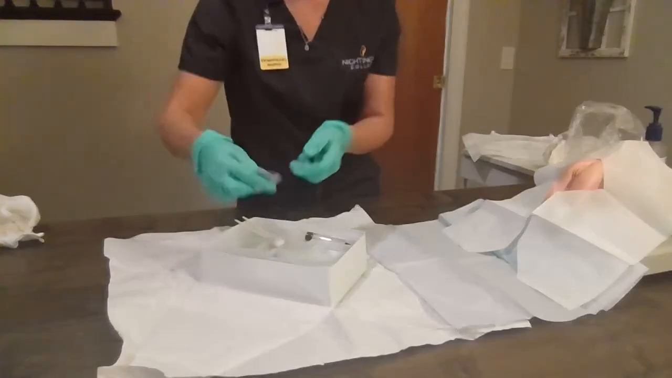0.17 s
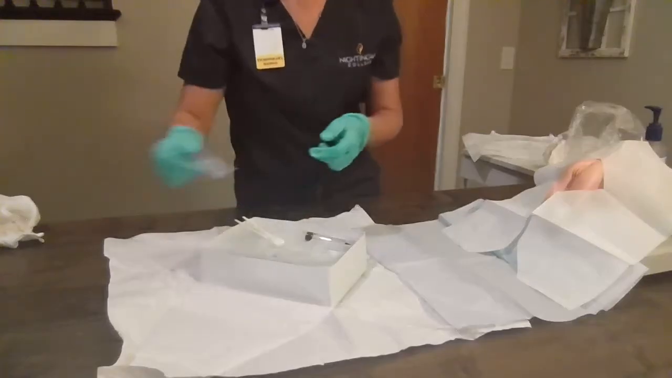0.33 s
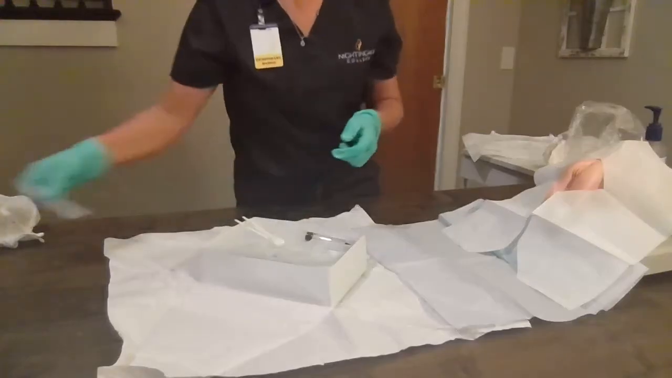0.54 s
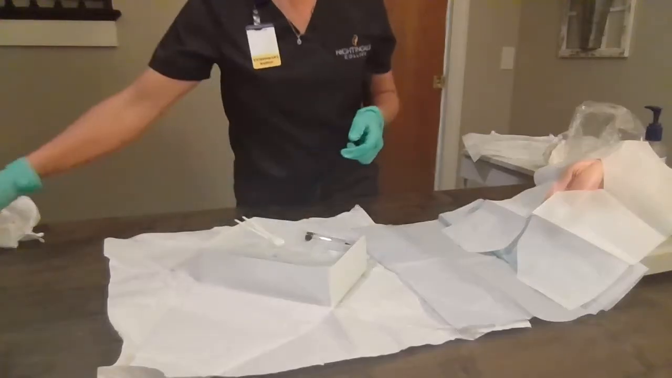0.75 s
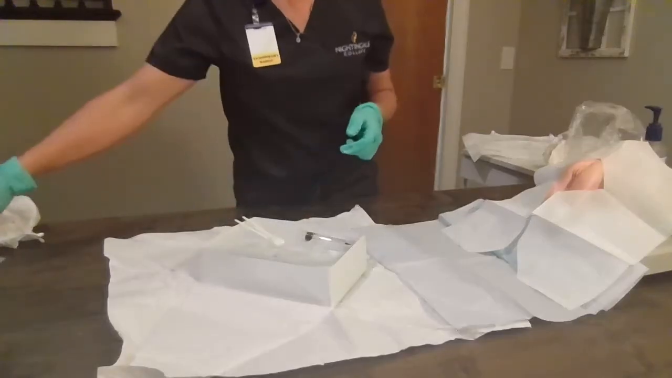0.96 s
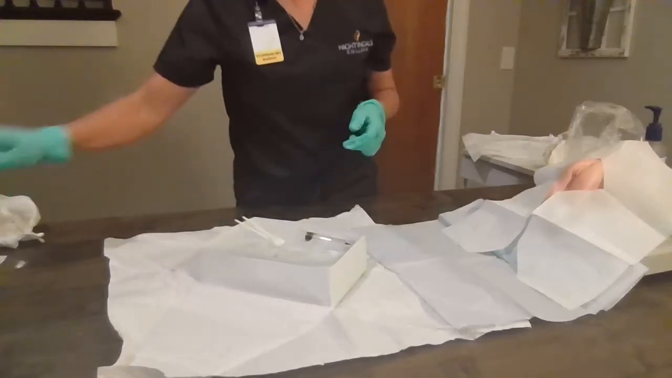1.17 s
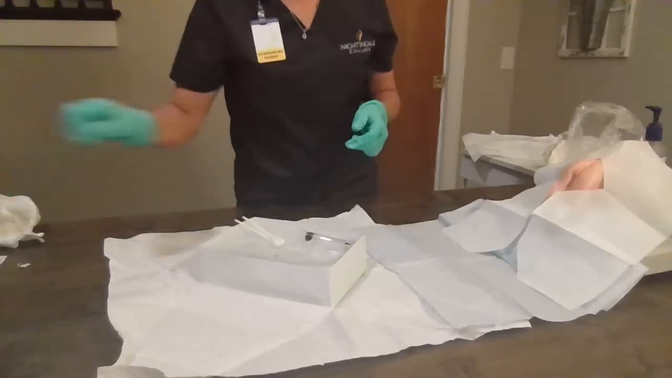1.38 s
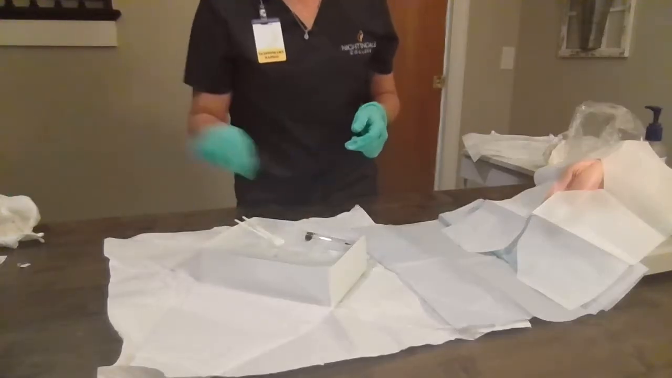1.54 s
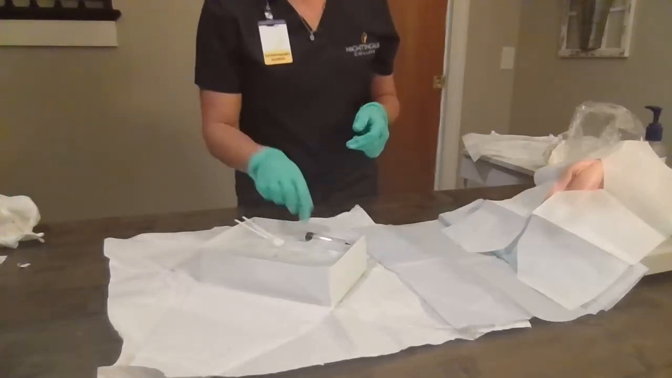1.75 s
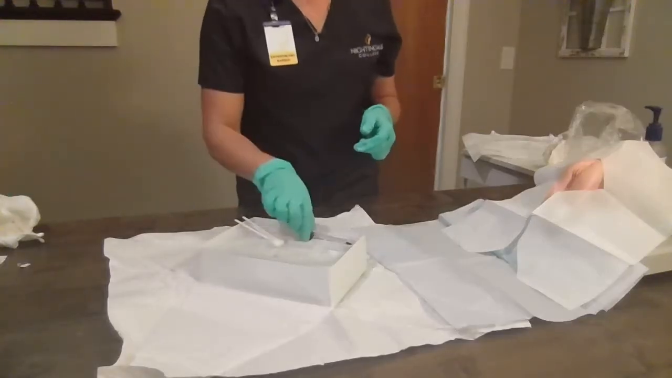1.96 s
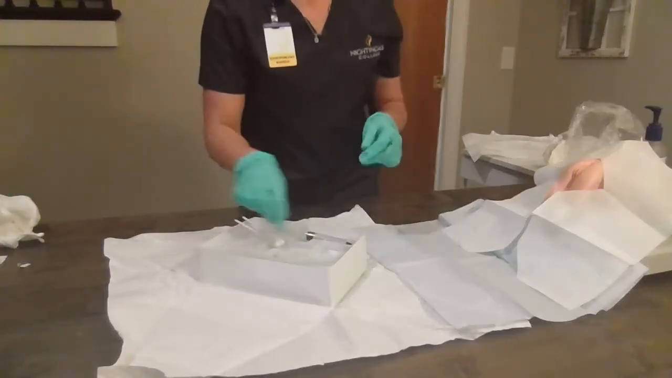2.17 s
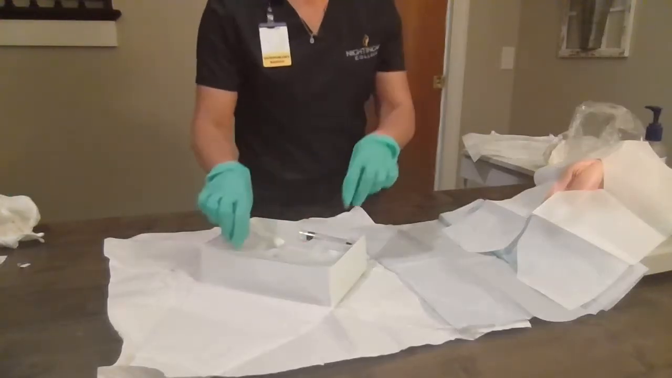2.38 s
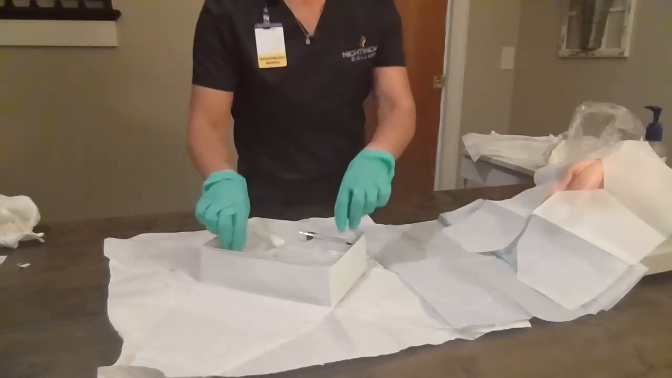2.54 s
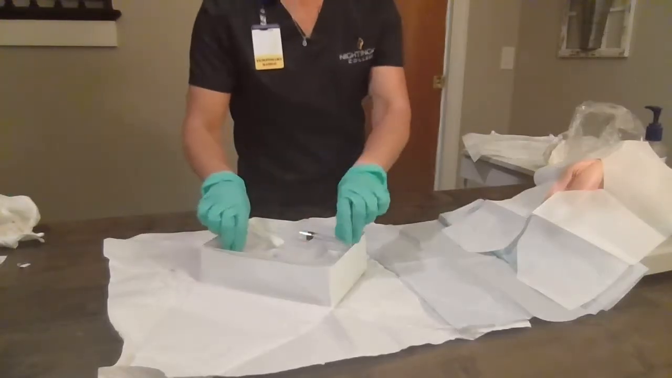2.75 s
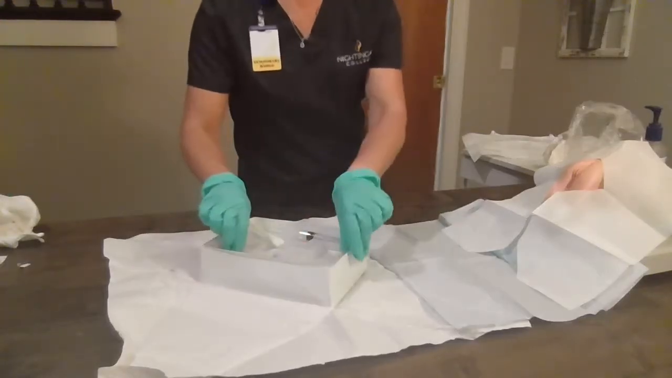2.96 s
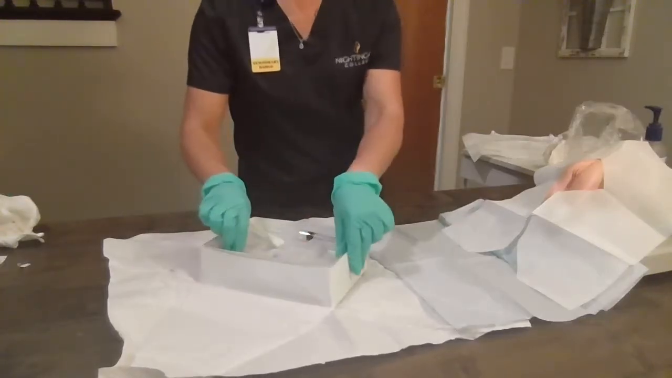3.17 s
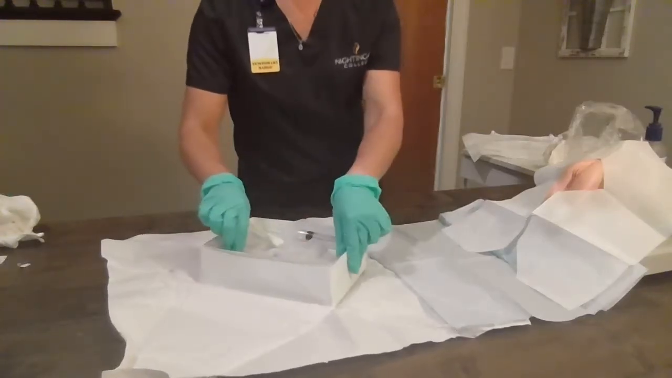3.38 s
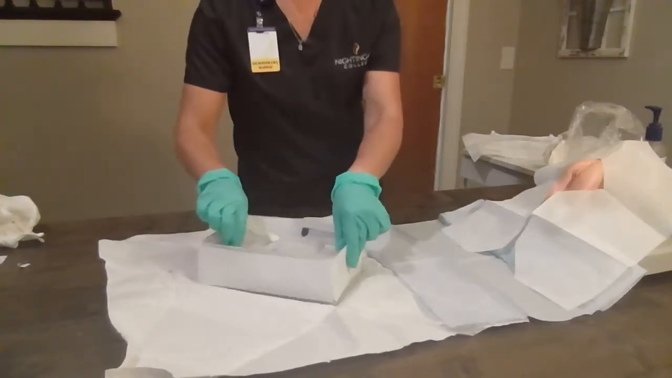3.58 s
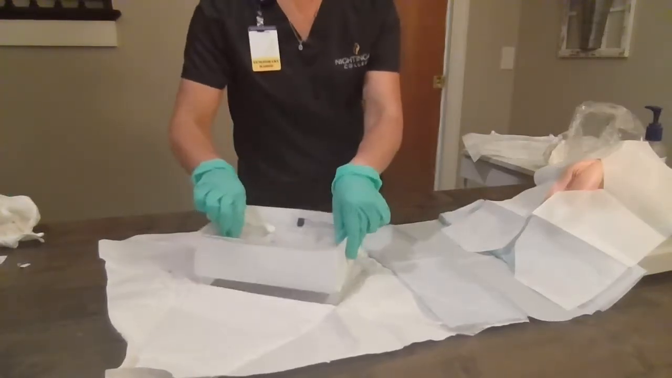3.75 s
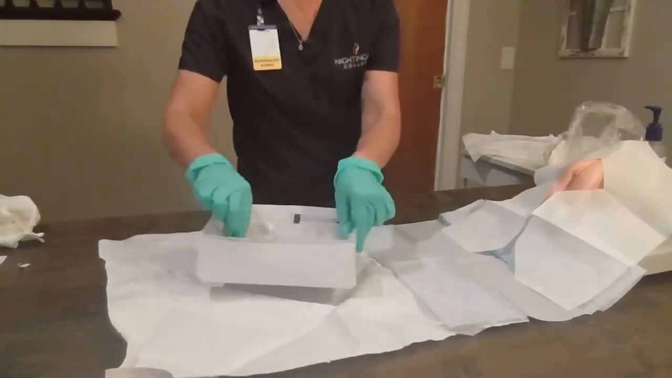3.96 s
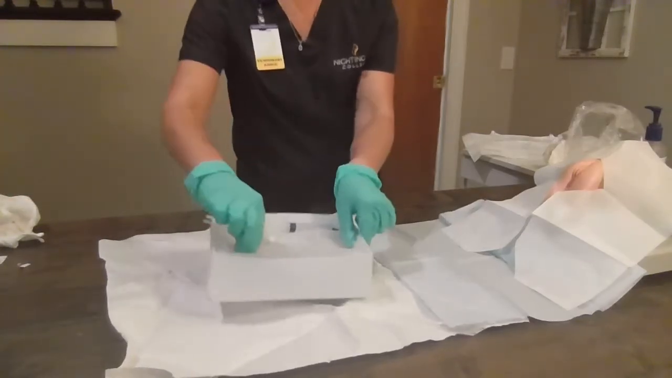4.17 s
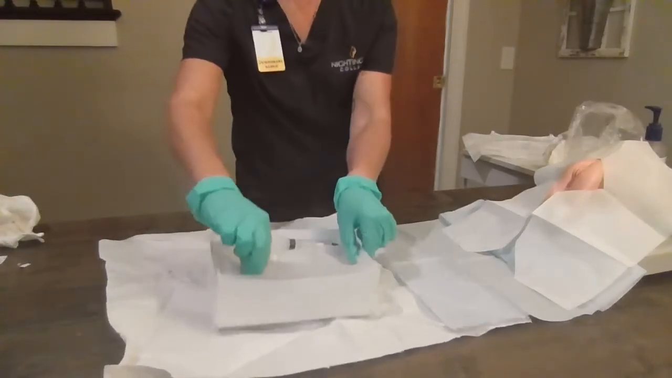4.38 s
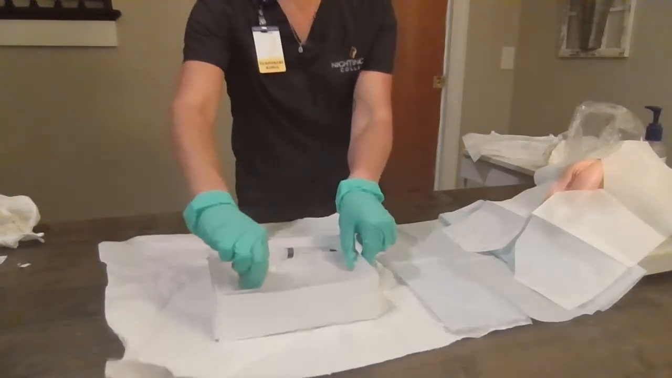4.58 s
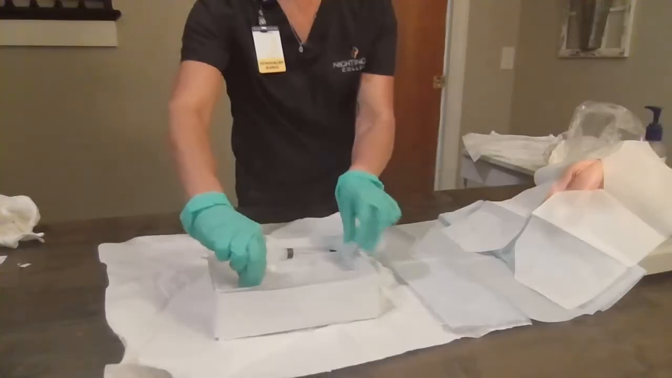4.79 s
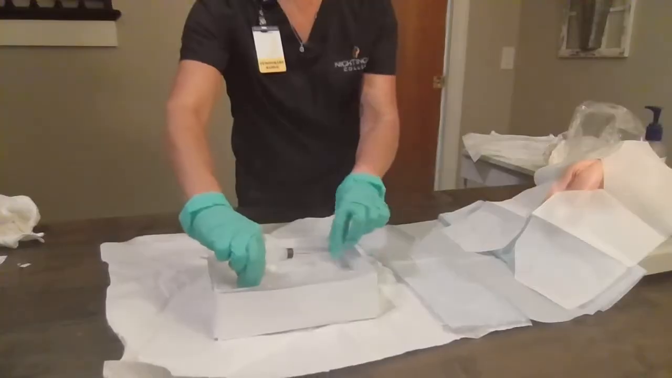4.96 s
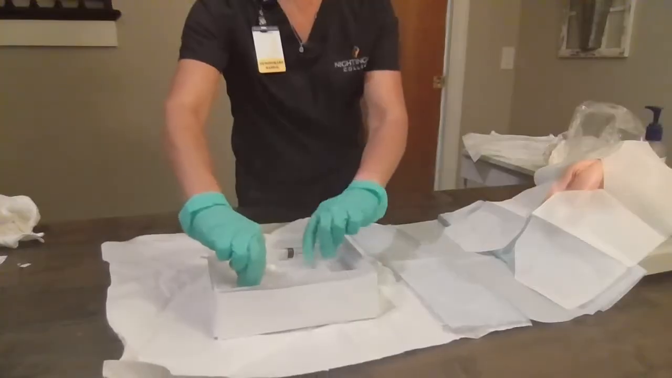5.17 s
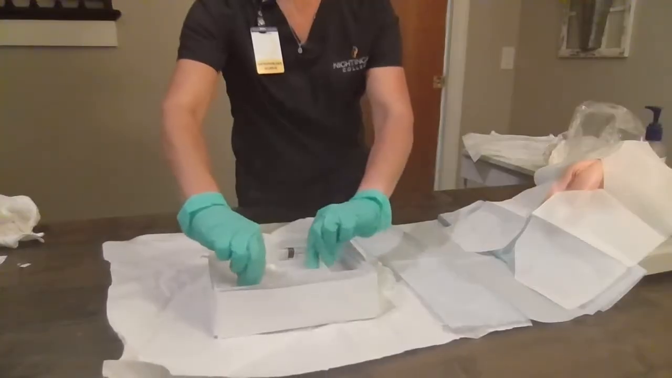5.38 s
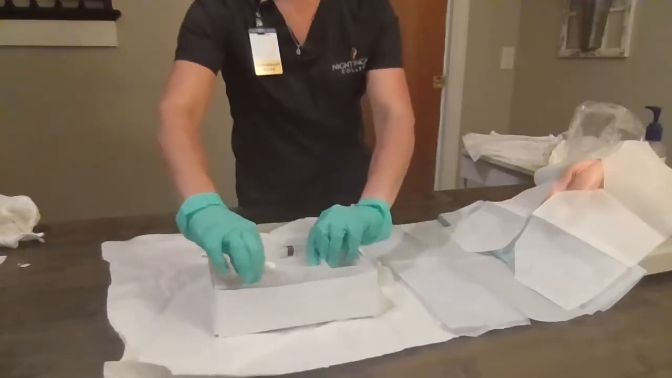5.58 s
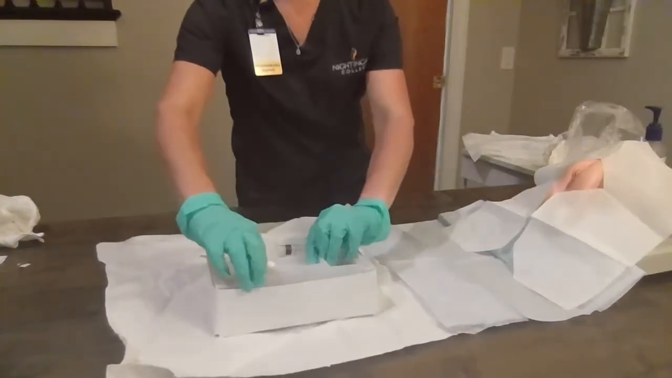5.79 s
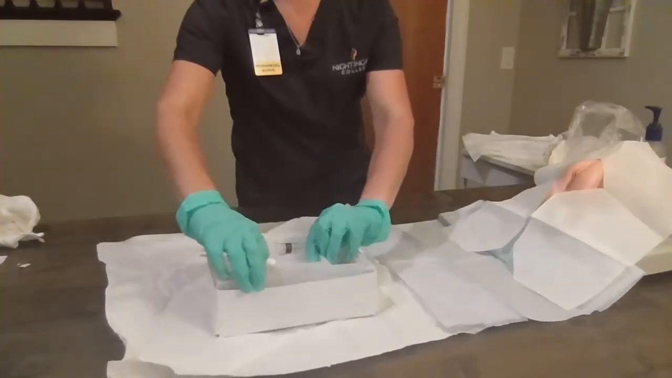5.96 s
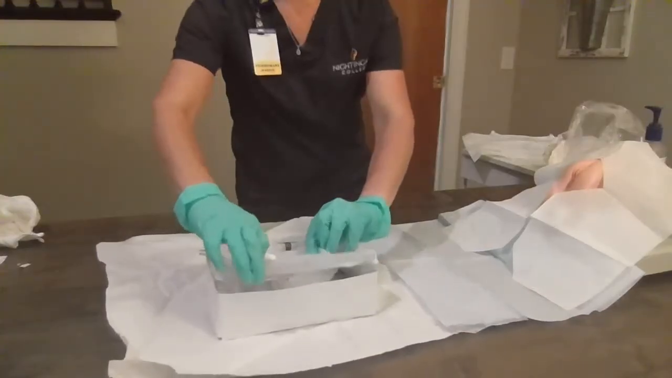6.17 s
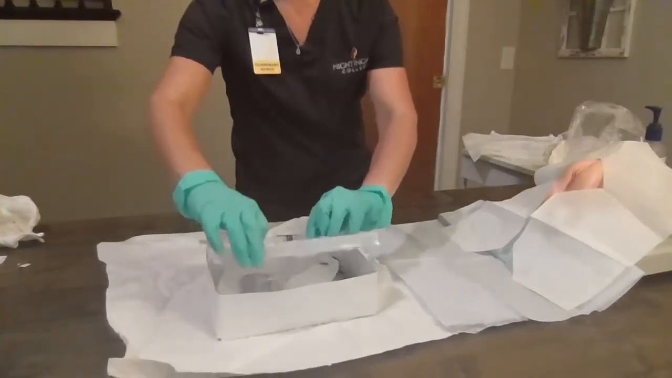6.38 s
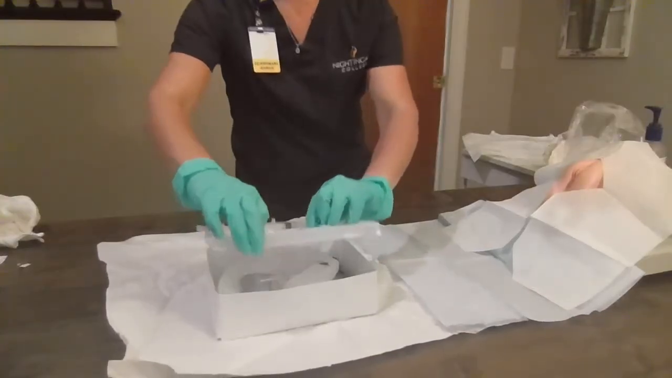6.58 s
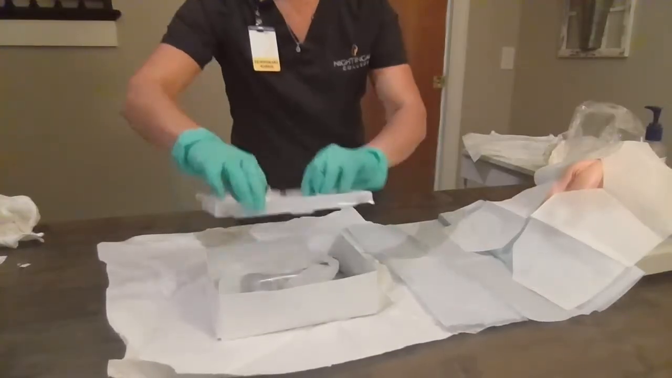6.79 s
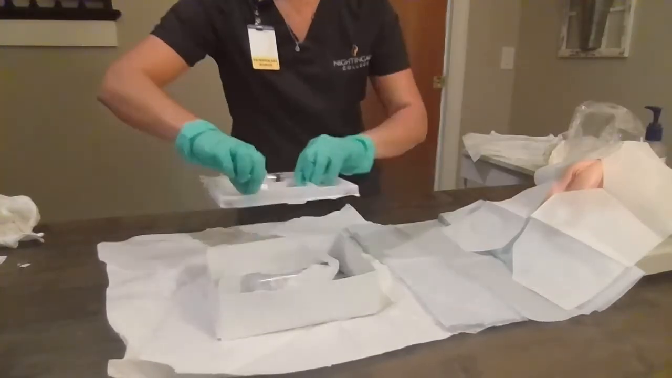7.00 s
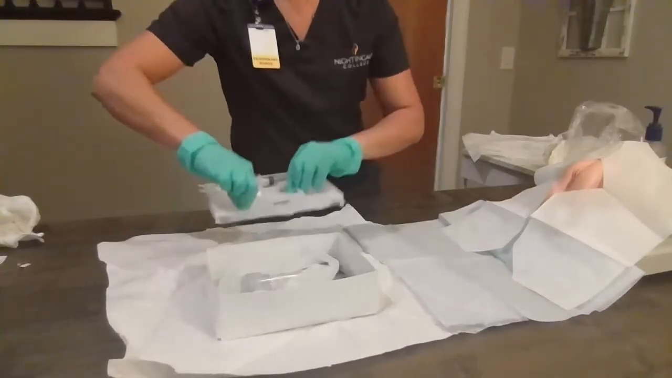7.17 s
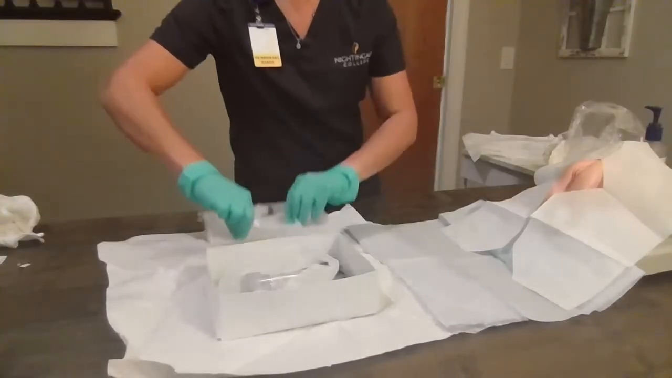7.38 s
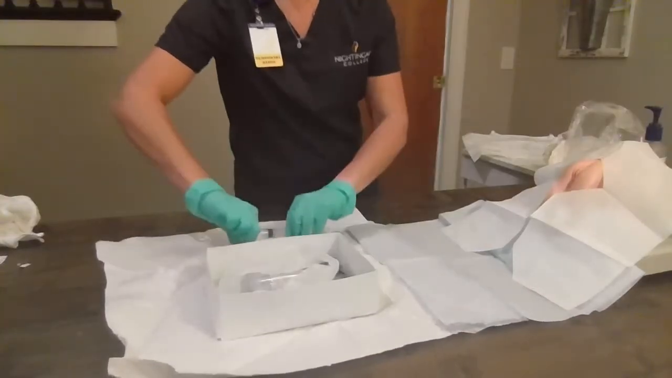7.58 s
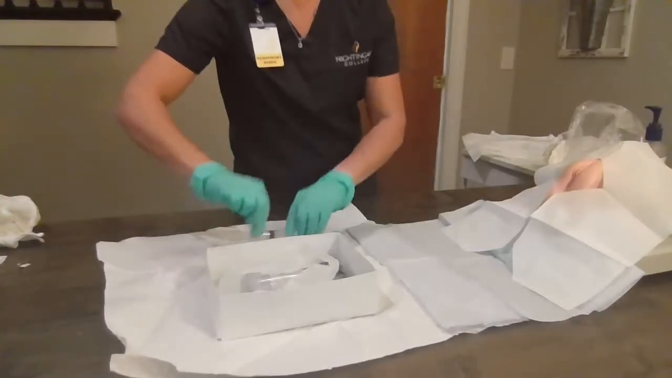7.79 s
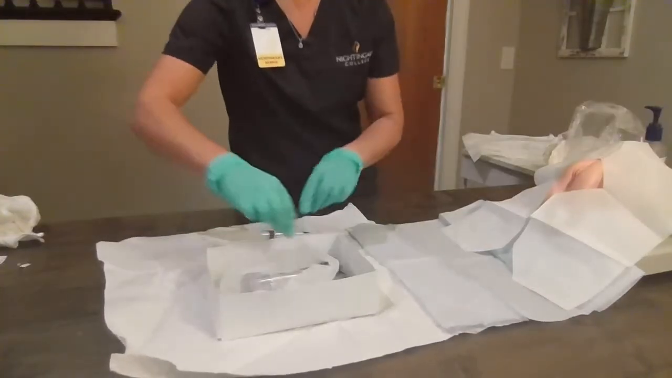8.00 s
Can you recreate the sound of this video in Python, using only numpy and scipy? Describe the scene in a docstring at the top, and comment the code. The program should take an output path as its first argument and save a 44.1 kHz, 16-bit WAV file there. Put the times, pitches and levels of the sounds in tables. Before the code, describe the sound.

Sparse, delicate handling of thin plastic on a draped table, same in both channels. Faint ticks and a short clatter come first, then dry rubs and a box nudged and set down with dull taps. Crackling builds into dense clicks and a bright dragging scrape, ending in a hard hollow snap. Brief clinks and a soft put-down follow over faint room hiss.

```python
"""Unpacking a thin plastic tray

Gloved hands unpack a kit tray on a draped table in a small room, heard alike in both channels.
A small part is dropped on the table, another into the tray; the box is turned and set down on its drape.
Then the snug inner tray scrapes, snaps free and is put down. Impacts excite decaying shell modes,
stick-slip impulses drive friction and squeaks, and diffuse reflections and steady room air surround them."""
import sys
import numpy as np
from scipy import signal
from scipy.fft import rfft, irfft
from scipy.io import wavfile
from scipy.ndimage import uniform_filter1d, map_coordinates

SR = 44100
rng = np.random.default_rng(int(sys.argv[2]) if len(sys.argv) > 2 else 0)


def to_wav(sig):
    """Store sig (one row per channel, or 1-D mono) as 16-bit WAV at the path in sys.argv[1].

    Samples outside -1..1 are clipped; the rate is SR.
    """
    pcm = np.clip(np.atleast_2d(sig), -1, 1) * 32767
    pcm = np.round(pcm).astype(np.int16)
    wavfile.write(sys.argv[1], SR, pcm.T)  # frames by channels


N = 354475
TIME = np.arange(N) / SR
THUD, BODY, EDGE, CRACK = (70, 380), (380, 2000), (2000, 5500), (5500, 17000)  # bands [Hz]


def undb(db):
    """Logarithmic level: decibels become an amplitude gain."""
    return 10 ** (np.asarray(db) / 20)


def unit(x):
    """Normalization: scale to rms 1."""
    return x / np.sqrt(np.mean(x ** 2))


def band(x, lo_hz, hi_hz, order=3):
    """Band limitation: a causal Butterworth band-pass."""
    high = min(hi_hz, SR / 2 - 1)
    return signal.sosfilt(signal.butter(order, [lo_hz, high], "band", fs=SR, output="sos"), x)


def spectral_gain(points, size):
    """Spectral envelope: interpolate (Hz, dB) points over log frequency."""
    hz, db = np.transpose(points)
    f = np.fft.rfftfreq(size, 1 / SR)
    return undb(np.interp(np.log(f + 1), np.log(hz), db))


def colour(x, points):
    """Spectral shaping: filter a sound by an envelope without phase shift; rms 1."""
    return unit(irfft(rfft(x) * spectral_gain(points, len(x)), len(x)))


def add(out, s, x):
    """Superposition: mix x into out from time s."""
    i = int(s * SR)
    out[i:i + len(x)] += x[:N - i]


def gesture(s, db):
    """Amplitude envelope: gain along a level curve, inaudible outside it."""
    return uniform_filter1d(undb(np.interp(TIME, s, db, left=-200, right=-200)), size=400)


def walk(rate):
    """Slow random modulation: straight lines between random knots, rate per second; rms 1."""
    knots = rng.standard_normal(int(N / SR * rate) + 2)
    return unit(np.interp(TIME * rate, np.arange(len(knots)), knots))


def slips(rate, spread_db, n):
    """Stick-slip: sparse impulses of uneven size and random sign, rate per second; rms 1."""
    size = undb(spread_db * np.minimum(rng.exponential(size=n), 4))
    occurs = rng.random(n) < rate / SR
    return unit(occurs * size * rng.choice([-1, 1], n))


def ring(modes, t, scatter_db=2.4, flex=0.0255):
    """Modal superposition: decaying shell modes, detuned and reweighted at each touch."""
    hz, db, t60 = np.transpose(modes)[:, :, None]
    bend, weight, sign = rng.standard_normal((3, len(modes), 1))
    waves = np.sin(2 * np.pi * hz * (1 + flex * bend) * t) * np.sign(sign)
    return np.sum(undb(db + scatter_db * weight - 60 * t / t60) * waves, axis=0)


def favour(x, hz, boost_db, q=4):
    """Point excitation: lift the one resonance chosen by where the shell is touched."""
    return x + undb(boost_db) * signal.lfilter(*signal.iirpeak(hz, q, fs=SR), x)


def contact(t, rise, fall, chatter_db):
    """Contact force: an impulse, weaker for slow build-ups, amid slips that swell and die away."""
    swell = np.exp(np.where(t < 0, t / max(rise, 1 / SR), -t / max(fall, 1 / SR)))
    slipping = slips(5000, 3.3, len(t)) * swell
    force = undb(chatter_db) * np.sqrt(fall / 0.0061) * slipping / (np.linalg.norm(slipping) + 1e-9)
    force[np.searchsorted(t, 0)] += np.exp(-rise / 0.0032)
    return force


def click(points, size):
    """Minimum phase: the sharpest first wave that an envelope permits, by folded cepstrum; rms 1."""
    cepstrum = irfft(np.log(spectral_gain(points, size)), size)[:size // 2]
    cepstrum[1:] *= 2
    return unit(irfft(np.exp(rfft(cepstrum, size)), size))


# a slow push chatters for longer and thuds less than a quick tap; the click fades with build-up time
TAP_S, CHATTER_GROWTH, THUD_LOSS_DB_PER_S, CLICK_S = 0.00059, 0.31, 1096, 0.00046


def knocks(hits, modes, spectrum, modes_db, dense_t60, crack_t60, chatter_db, boost_db, level_db,
           thud_db, edge_db, edge_share, chatter_s, click_db):
    """Impact excitation: force convolved with a shell response, balanced in four bands."""
    out, t = np.zeros(N), TIME[:SR // 3]
    lead = SR // 25  # room for the build-up before the blow
    blow = slice(lead, lead + SR // 83)  # levels hold for the first 12 ms of a blow
    first_wave = np.roll(click(spectrum, len(t)), lead)
    for s, strength, bright, hz, rise in hits:
        fall = chatter_s * (rise / TAP_S) ** CHATTER_GROWTH
        force = contact(t - lead / SR, rise, fall, chatter_db)
        # crowded modes merge into decaying noise beside the separate ones
        dense = colour(rng.standard_normal(len(t)), spectrum)
        shell = unit(dense * undb(-60 * t / dense_t60)) + undb(modes_db) * unit(ring(modes, t))
        ringing = unit(signal.fftconvolve(force, shell)[:len(t)])
        ringing += undb(click_db) * np.exp(-rise / CLICK_S) * first_wave
        tick = signal.fftconvolve(force, dense * undb(-60 * t / crack_t60))[:len(t)]
        thud, edge, crack = band(ringing, *THUD), band(ringing, *EDGE), band(tick, *CRACK)
        body = favour(band(ringing, *BODY), hz, boost_db)
        balance = thud_db - THUD_LOSS_DB_PER_S * rise, 0, edge_db + edge_share * bright, bright
        for db, part in zip(balance, (thud, body, edge, crack)):
            add(out, s - lead / SR, undb(level_db + strength + db) * part / np.std(part[blow]))
    return out


def shaken(grains, modes, spectrum, modes_db, shift_db=3.0, flex=.025):
    """Driven resonance: slips keep modes ringing that trade strength and drift in pitch."""
    ringing = 0
    for hz, db, t60 in modes:
        q = np.pi * hz * t60 / np.log(1000)
        mode = signal.lfilter(*signal.iirpeak(hz, q, fs=SR), grains)
        ringing = ringing + unit(mode) * np.sqrt(t60) * undb(db + shift_db * walk(14))
    flexed_clock = np.cumsum(1 + flex * walk(16))  # in samples
    flexed = map_coordinates(ringing, [flexed_clock], order=1, mode="mirror")
    return colour(grains, spectrum) + undb(modes_db) * unit(flexed)


def crinkles(count, low_hz, high_hz, cycles, spread_db):
    """Transient buckling: tiny catches each ring for some cycles at a random pitch; rms 1."""
    out, t = np.zeros(N), TIME[:SR // 20]
    for when, pitch, size in rng.random((count, 3)):
        hz = low_hz * (high_hz / low_hz) ** pitch
        snap = np.sin(2 * np.pi * hz * t) * np.exp(-t * hz / cycles)
        add(out, when * TIME[-1], undb(-spread_db * np.log(max(size, 1 / 20))) * snap)
    return unit(out)


def friction(body, surface, body_gain, edge_gain, hiss_gain):
    """Friction radiation: slips sound through the shell's body, its stiff edges and as hiss."""
    parts = band(body, 270, BODY[1]), band(surface, *EDGE), band(surface, *CRACK)
    return sum(unit(part) * gain for part, gain in zip(parts, (body_gain, edge_gain, hiss_gain)))


# a stroke swells, is strongest half way and dies away; the hand's pressure wavers
STROKE_ATTACK_DB_PER_S, STROKE_RELEASE_DB_PER_S = 362.5, 286.5
STROKE_ARCH_DB, STROKE_WAVER_DB = 1, 0.9


def strokes(starts, lengths, levels):
    """Stroke envelope: attack, gently arched hold and release; the loudest stroke governs."""
    curves = []
    for s, length, level in zip(starts, lengths, levels):
        arch = STROKE_ARCH_DB * np.minimum((2 * (TIME - s) / length - 1) ** 2, 1)
        attack = STROKE_ATTACK_DB_PER_S * np.maximum(s - TIME, 0)
        release = STROKE_RELEASE_DB_PER_S * np.maximum(TIME - s - length, 0)
        curves.append(level - arch - attack - release)
    return undb(np.max(curves, axis=0))


def resonance(hz, half_width_hz, rate, spread_db):
    """Amplitude modulation: low-frequency slips spread a moving tone into a narrow band; rms 1."""
    carrier = np.sin(2 * np.pi * np.cumsum(hz) / SR)
    return unit(band(slips(rate, spread_db, N), 3.8, half_width_hz, order=2) * carrier)


# the box is nudged, turned, set down and left to rock:
# (time [s], relative strength [dB], brightness [dB], main resonance [Hz], build-up [s])
TRAY_HITS = [(2.672, -52.5, -32, 644, 0.0037), (2.975, -53, -15, 1140, 0.021),
             (3.2185, -41.5, -2, 1610, 0.0004), (3.232, -43, -13, 1499, .0008),
             (3.384, -45, -41, 1420, 0.013), (3.52, -57, -25, 1140, 0.028),
             (3.722, -50.5, -34, 844, 0.0055), (4.485, -45.5, 2, 1500, 0.00057),
             (4.509, -38, -18, 610, 0.0006), (4.521, -41, -11, 610, 0.00017),
             (4.53, -36, -10, 590, 0.00045), (4.545, -42.5, -2.5, 1500, 0.00033),
             (4.5895, -37, -17, 940, 0.0001), (4.6275, -40, -9.5, 605, 0.0002),
             (4.641, -40.5, -6, 577, 0.00036), (4.652, -46, -1, 600, .0004),
             (4.7213, -38.5, -19, 870, 0.0003), (4.737, -47, -20, 600, 0.0013),
             (4.808, -51.5, -4, 865, 0.0038), (5.1, -57.5, -2, 777, 0.021), (6.838, -41, -10, 482.5, 0.023)]
# the gripped tray buckles and catches on the box wall: same columns
BUCKLES = [(5.389, -48, -28, 1240, 0.00092), (5.405, -42, -15.5, 625, 0.012),
           (5.511, -40.5, -42, 457, 0.0022), (5.5955, -29.5, -6, 676, 0.00076),
           (5.61, -31, -8.5, 1250, 0.001), (5.7195, -34.5, -25, 730, 0.00026),
           (5.729, -34.5, -18, 510, 0.0029), (5.836, -29.5, -20, 595, 0.00049),
           (5.855, -23, -14.5, 610, 0.0072), (5.876, -26.5, -28, 585, 0.0005),
           (5.94, -33, -6.5, 1450, 0.00092), (5.97, -30.5, -20, 500, 0.00045),
           (5.984, -29, -18, 1530, 0.0041), (6.003, -25, -2, 1386, 0.0022), (6.0138, -18, -9, 508, 0.00029),
           (6.031, -38.5, -16, 600, .0003), (6.051, -39, -1.5, 1500, 0.00028),
           (6.084, -32, -9, 1400, 0.0008), (6.1, -23.5, -11.5, 600, 0.019),
           (6.146, -26, -5.5, 1350, 0.0085), (6.1545, -27, 1, 1400, 0.0011),
           (6.1578, -17, -1.5, 642, 0.0002), (6.169, -25.5, -19, 640, 0.0017),
           (6.179, -30, 6.5, 644, .0002), (6.261, -28.5, -3.5, 1500, .0001),
           (6.2775, -24, -2.5, 1246, 0.00035), (6.286, -32, -3, 1490, .0003),
           (6.2995, -29.5, 2.5, 1594, 0.0002), (6.3195, -34, -2, 1493, .0002),
           (6.345, -29, -5, 1360, 0.0003), (6.373, -32, -4, 1403, .0003), (6.394, -32.5, -9, 1196, .0001),
           (6.453, -32.5, -10.5, 2700, .0002)]
# the tray pops free and the box drops back: same columns
POPS = [(6.4803, -10.5, -11.5, 1130, 0.00045), (6.4915, -18, -9, 1655, 0.0019),
        (6.5412, -25.5, 4.5, 1250, 0.0016)]
# separate modes of the tray: (nominal frequency [Hz], relative level [dB], 60 dB decay time [s])
TRAY_MODES = [(294.4, -10, 0.284), (372, -10, 0.23), (458, -0.5, 0.078), (563, -3.5, 0.16),
              (636, 2.5, 0.052), (706, -9, 0.026), (795, 3.5, 0.078), (932, -1, 0.1), (1120, -21.5, 0.11),
              (1237, -1, 0.071), (1462, -2, 0.085), (1600, -0.5, 0.1), (1918, -3, 0.059), (2190, -12, 0.28),
              (2670, -13.5, 0.083), (3010, -9, 0.12), (3587, -0.5, 0.024), (3990, -10.5, 0.1),
              (5680, -8.5, 0.056), (6400, -14.5, 0.17), (6980, -13, 0.17)]
# its crowded, quickly damped modes: (frequency [Hz], relative spectral level [dB])
TRAY_COLOUR = [(47, -53), (80, -30), (208, -23), (289, -3), (404, -2.5), (629, 1), (1000, -6), (1280, -1),
               (1780, -13.5), (1990, -14), (5280, -22.5), (6590, -25.5), (8230, -28), (15000, -28),
               (16000, -35)]


def tray_knocks(pop_top_hz=10500):
    """Impact on one shell: knocked in its box, buckled by the fingers, popped free more roundly."""
    shell = dict(modes=TRAY_MODES, spectrum=TRAY_COLOUR, modes_db=-3.0, dense_t60=0.034,
                 crack_t60=0.025, level_db=-1.5)
    knocked = knocks(TRAY_HITS, **shell, chatter_db=13.0, boost_db=-1.5, thud_db=-14.0,
                     edge_db=-0.5, edge_share=0.17, chatter_s=0.0077, click_db=-6.5)
    buckled = knocks(BUCKLES, **shell, chatter_db=3.5, boost_db=11.5, thud_db=-17.0,
                     edge_db=1.0, edge_share=0.63, chatter_s=0.0036, click_db=-0.5)
    popped = knocks(POPS, **shell, chatter_db=-3.5, boost_db=-21.0, thud_db=-19.5,
                    edge_db=-1.5, edge_share=0.8, chatter_s=0.0042, click_db=7)
    return knocked + buckled + band(popped, 30, pop_top_hz, order=2)


# the tray's rim drags up the box wall, brighter as it binds:
# (time [s], relative level [dB], brightness [dB])
SCRAPE = [(5.81, -48, -12), (5.85, -36.5, 6), (5.91, -31.5, -13), (5.979, -35, -1), (6.12, -32, -6.5),
          (6.24, -33, 2), (6.33, -29, 0.5), (6.385, -27.5, 2.5), (6.46, -31, -0.5), (6.52, -32, -7.5),
          (6.59, -28.5, -10.5), (6.66, -39, -10), (6.762, -49.5, -12)]
# spectrum of the dragging shell: (frequency [Hz], relative spectral level [dB])
SCRAPE_COLOUR = [(59, -60.5), (100, -24), (202, -22.5), (420, -4.5), (595, 3.5), (970, -3), (1300, 2.5),
                 (1600, -6.5), (1850, -15), (2150, -6.5), (2470, -15.5), (3540, -12), (4670, -19.5),
                 (6700, -19.5), (7940, -22.5), (13500, -25.5), (16000, -28)]


def scrape(modes_db=-4, judder_db=2.3, level_db=-1.7, edge_db=-2.5, hiss_db=-9.5, hiss_share=0.62,
           crinkle_db=-6):
    """Stick-slip friction: the rim catches along the wall, so the tray shakes and crinkles."""
    grains = slips(3500, 2.0, N) * undb(judder_db * walk(90))
    shell = shaken(grains, TRAY_MODES, SCRAPE_COLOUR, modes_db)
    s, db, bright = np.transpose(SCRAPE)
    body_gain, edge_gain = gesture(s, db), gesture(s, db + edge_db + bright)
    hiss_gain = gesture(s, db + hiss_db + hiss_share * bright)
    catches = crinkles(count=1100, low_hz=907, high_hz=6400, cycles=9.8, spread_db=3.6)
    dragging = friction(shell, shell, body_gain, edge_gain, hiss_gain)
    return undb(level_db) * (dragging + undb(crinkle_db) * edge_gain * catches)


# the box wall groans as it is bent and let go: (time [s], level [dB], pitch [Hz])
GROAN = [(5.825, -57, 600), (5.861, -44, 588), (5.911, -43, 501), (5.95, -37, 479), (5.99, -49.5, 440),
         (6.041, -39.5, 369.3), (6.075, -38.5, 510.7), (6.115, -36.5, 625), (6.18, -38, 630),
         (6.24, -45.5, 599), (6.32, -45.5, 630), (6.41, -36.5, 630.5), (6.47, -43.5, 599.6),
         (6.539, -40.5, 470), (6.61, -37, 462), (6.66, -48.5, 467), (6.76, -63, 471)]


def groan(half_width_hz=32):
    """Stick-slip resonance: slips ring the box wall at a pitch that moves as it is bent."""
    s, db, hz = np.transpose(GROAN)
    return gesture(s, db) * resonance(np.interp(TIME, s, hz), half_width_hz, 690, 2.5)


# loose instruments in the lifted tray touch and sing briefly:
# (time [s], frequency [Hz], nominal level [dB], decay to 1/e [s])
CLINKS = [(6.7935, 1467, -23, 0.0068), (7.009, 797, -46.5, 0.067), (7.0595, 1470, -32, 0.016),
          (7.305, 364, -54.5, 0.032), (7.395, 812, -29.5, 0.02), (7.4, 1220, -37, .01)]


def clinks(overtone=1.93, overtone_db=-13.5, attack_s=0.0044):
    """Inharmonic partials: each instrument rings on one note with a weak overtone."""
    out, t = np.zeros(N), TIME[:SR // 3]
    for s, hz, db, decay in CLINKS:
        phase = 2 * np.pi * hz * t
        note = np.sin(phase) + undb(overtone_db) * np.sin(overtone * phase)
        add(out, s, undb(db) * note * np.exp(-t / decay) * (1 - np.exp(-t / attack_s)))
    return out


# spectrum of rubbing gloves and paper: (frequency [Hz], relative spectral level [dB])
RUB_COLOUR = [(1200, 4), (2800, 3), (4500, 2), (6500, 2), (8000, -3), (10500, 2), (15500, -2)]


def rub(rows, modes, spectrum, modes_db, level_db, edge_db, edge_share, flutter_db=1.7, crackle_db=-7):
    """Sliding friction: fine grains hiss, crackle faintly and sound softly through the plastic."""
    grains = slips(13000, 1.8, N) * undb(flutter_db * walk(60))
    s, length, hiss, along = np.transpose(rows)
    body = shaken(grains, modes, spectrum, modes_db)
    crackle = crinkles(count=1300, low_hz=2260, high_hz=9240, cycles=9, spread_db=3.5)
    surface = colour(grains, RUB_COLOUR) + undb(crackle_db) * crackle
    levels = hiss + along, hiss + edge_db + edge_share * along, hiss
    gains = [strokes(s, length, db) for db in levels]
    return undb(level_db + STROKE_WAVER_DB * walk(24.65)) * friction(body, surface, *gains)


# the lifted tray and its contents rattle:
# (time [s], relative strength [dB], brightness [dB], main resonance [Hz], build-up [s])
LIFTED_HITS = [(6.8145, -36, -6, 1494, 0.0011), (6.8225, -30.5, -11, 1406, 0.00067),
               (6.834, -35.5, -28, 1700, 0.00058), (7.007, -47, -10, 1630, 0.0045),
               (7.062, -44.5, -13, 1420, 0.0033), (7.091, -34, -28, 780, 0.00089),
               (7.098, -39, -20, 1350, 0.0015), (7.11, -48, -29, 1500, 0.0016),
               (7.3115, -70, 19, 402, 0.00018), (7.366, -37, -11.5, 804, 0.0011),
               (7.379, -40.5, -18, 820, 0.0017), (7.394, -34.5, -18, 1200, 0.0017),
               (7.407, -33.5, -20, 1210, 0.0017), (7.422, -43, -36, 1200, 0.0017),
               (7.452, -41, -24, 1570, .003), (7.467, -40, -15, 1800, .004),
               (7.4772, -30, -12, 1570, 0.00014), (7.488, -42.5, -3, 1400, 0.0012),
               (7.503, -45, -15, 1110, 0.001), (7.538, -44.5, -4, 1535, 0.0036),
               (7.63, -37.5, 5.5, 1550, 0.0014), (7.639, -33.5, -9, 1560, 0.0026),
               (7.659, -47, 5, 1400, 0.00091), (7.677, -38, 2, 1460, 0.00022),
               (7.69, -36, -1.5, 1330, 0.003), (7.725, -41.5, -10, 1380, 0.0071)]
# its separate modes: (nominal frequency [Hz], relative level [dB], 60 dB decay time [s])
LIFTED_MODES = [(446, -1, 0.06), (810, -1.5, 0.073), (1200, 2, 0.04), (1393, 13.5, 0.036),
                (1580, 10.5, 0.046), (1930, 0, 0.12), (2330, -24, 0.045), (2805, -0.5, 0.097),
                (3310, 5.5, 0.035), (4080, -13, 0.036), (4690, -9, 0.049)]
# its crowded modes: (frequency [Hz], relative spectral level [dB])
LIFTED_COLOUR = [(47, -42), (80, -5), (133, -10), (242, -18), (451, -6), (563, -15), (802, 4), (1000, -4),
                 (1430, -1.5), (2080, -9), (2600, -7.5), (6170, -19), (8050, -29), (15000, -29),
                 (16000, -41)]
# it slides onto the drape:
# (time [s], length [s], relative hiss [dB], tray sounding along, relative to the hiss [dB])
SLIDE = [(7.385, 0.03, -61.5, 16), (7.485, 0.019, -47, 5.9), (7.54, 0.16, -52, 6),
         (7.645, 0.046, -46.5, 1.8)]


def lifted_tray():
    """Impact and friction: the freed tray rattles, its contents clink and it slides down."""
    rattle = knocks(LIFTED_HITS, LIFTED_MODES, LIFTED_COLOUR, modes_db=-3.5, dense_t60=0.047,
                    crack_t60=0.0085, chatter_db=6.0, boost_db=5.0, level_db=-3.0, thud_db=-27.5,
                    edge_db=2.0, edge_share=0.32, chatter_s=0.0082, click_db=-5.5)
    slide = rub(SLIDE, LIFTED_MODES, LIFTED_COLOUR, modes_db=-9, level_db=-5.0, edge_db=6, edge_share=0.28)
    return rattle + clinks() + slide


# a small part bounces to rest on the table:
# (time [s], relative strength [dB], brightness [dB], main resonance [Hz], build-up [s])
TABLE_HITS = [(0.905, -47, -6, 720, 0.00065), (0.9202, -28, -9, 690, 0.00034),
              (0.9303, -31, -3, 700, 0.00028), (0.944, -32.5, -23, 1710, 0.00094),
              (0.9535, -40, -20, 2500, .0002), (0.969, -44, -20, 1370, 0.00035),
              (0.973, -38, -7, 1370, 0.00037), (0.997, -33.5, -10, 1560, 0.00005),
              (1.0035, -44, -3, 1500, 0.00046), (1.0135, -40.5, -22, 3050, 0.00035),
              (1.0195, -41, -24, 1500, .0001), (1.0365, -44, -22, 3030, .0002),
              (1.054, -47, -22, 2600, .0003), (1.068, -45.5, -20, 720, 0.00074),
              (1.083, -46, -13, 720, 0.0018), (1.102, -48.5, -12, 3050, .0002),
              (1.112, -51, -8, 1660, 0.00048), (1.235, -65.5, 7, 1450, 0.02)]
# its separate modes: (nominal frequency [Hz], relative level [dB], 60 dB decay time [s])
PART_MODES = [(562, -8, 0.049), (720, 3, 0.046), (1433, 3, 0.036), (1590, -1, 0.055), (1720, -4, 0.06),
              (2020, -18, 0.1), (2420, -0.5, 0.14), (3110, -12, 0.3)]
# its crowded modes: (frequency [Hz], relative spectral level [dB])
PART_COLOUR = [(47, -49), (80, -22), (186, -8), (259, 0.5), (338, -17), (575, -4.5), (615, -37), (718, -4),
               (1140, -9), (1700, -8), (2540, -6.5), (3120, -12), (3600, -20), (4730, -25), (5520, -19),
               (9190, -4), (16000, -10.5)]


def part_on_table():
    """Repeated impact: the dropped part rings at every bounce."""
    return knocks(TABLE_HITS, PART_MODES, PART_COLOUR, modes_db=-8.5, dense_t60=0.089,
                  crack_t60=0.014, chatter_db=4.5, boost_db=-4, level_db=-2.0, thud_db=-14.5,
                  edge_db=-3.5, edge_share=0.028, chatter_s=0.0032, click_db=-1)


# a second part clatters into the tray:
# (time [s], relative strength [dB], brightness [dB], main resonance [Hz], build-up [s])
DROP_HITS = [(1.878, -56, -30, 1402, 0.0037), (1.931, -34.5, -8.5, 1190, 0.0022),
             (1.939, -34.5, -16, 1180, 0.0011), (1.948, -36, -18, 474, 0.00092),
             (1.965, -31, -27, 470, 0.0012), (1.98, -37, -15, 468, 0.00057),
             (1.9898, -28, -15.5, 1090, 0.00028), (1.9975, -32.5, -26, 470, 0.00022),
             (2.0065, -45, -19, 470, 0.00036), (2.019, -43, -28, 626, 0.0006)]
# separate modes it excites: (nominal frequency [Hz], relative level [dB], 60 dB decay time [s])
DROP_MODES = [(317, 3.5, 0.073), (476, 1.5, 0.081), (610, 1, 0.092), (913, -14, 0.13), (1110, -4, 0.06),
              (1637, 1, .07), (2330, -13, .05), (3165, 7.5, 0.04), (3610, 1, 0.052)]
# crowded modes it excites: (frequency [Hz], relative spectral level [dB])
DROP_COLOUR = [(47, -56), (80, -24), (146, -17), (271, -25), (316, -10), (386, -27), (643, 2.5),
               (702, -3.5), (1090, 0.5), (1460, -13), (1650, -3), (2000, -13.5), (3100, -10), (3790, -13.5),
               (16000, -21)]


def part_into_tray():
    """Repeated impact: the second part clatters as it lands."""
    return knocks(DROP_HITS, DROP_MODES, DROP_COLOUR, modes_db=0.0, dense_t60=0.042,
                  crack_t60=0.0078, chatter_db=-6.5, boost_db=1.5, level_db=-1.0, thud_db=-21,
                  edge_db=-0.5, edge_share=0.21, chatter_s=0.011, click_db=-0.5)


def settle(start_s=2.03, end_s=2.166, first_hz=1170, last_hz=970, first_db=-57, last_db=-58,
           wobble_db=2.5, wobble=.028):
    """Frequency modulation: the second part rocks to rest on one unsteady, sinking note."""
    hz = np.interp(TIME, [start_s, end_s], [first_hz, last_hz]) * (1 + wobble * walk(150))
    rocking = unit(np.sin(2 * np.pi * np.cumsum(hz) / SR) * undb(wobble_db * walk(96)))
    return rocking * gesture([start_s, end_s, end_s + 0.03], [first_db, last_db, last_db - 25])


# gloves and paper slide on the box:
# (time [s], length [s], relative hiss [dB], box sounding along, relative to the hiss [dB])
RUBS = [(1.54, .015, -71, -9), (2.46, 0.011, -52.5, -7), (2.58, 0.13, -61, 5), (3.085, 0.12, -50, -4.5),
        (3.46, 0.17, -56, -8), (4.09, 0.033, -67.5, 13), (4.27, 0.39, -55, -4), (4.47, 0.039, -36, -2),
        (4.655, 0.01, -48.5, 6), (4.77, 0.11, -55.5, -0.5), (5.26, 0.096, -65, 10), (5.465, 0.11, -43, -32),
        (5.592, 0.015, -32, 2), (5.695, 0.014, -38, -37)]


def gloves_and_paper():
    """Sliding friction: hands and drape rub the box, which sounds along."""
    return rub(RUBS, TRAY_MODES, TRAY_COLOUR, modes_db=1.5, level_db=-4.5, edge_db=-0.5, edge_share=0.21)


def rasps(rows, half_width_hz, flutter_db):
    """Stick-slip resonance: juddering strokes over plastic, each around its own pitch."""
    s, length, db, hz = np.transpose(rows)
    halfway = (s[:-1] + length[:-1] + s[1:]) / 2  # the pitch changes between strokes
    pitch = hz[np.searchsorted(halfway, TIME)]
    judder = undb(flutter_db * walk(62))
    return resonance(pitch, half_width_hz, 2500, 2.6) * judder * strokes(s, length, db)


# a rubber fingertip or the tray's rim drags with a thin rasp:
# (time [s], length [s], level [dB], centre [Hz])
SCUFFS = [(1.54, .018, -64.5, 4350), (3.1, 0.11, -65, 2485), (3.455, 0.035, -64, 5440),
          (3.58, .055, -64.5, 5520), (4.198, 0.07, -65, 4460), (4.642, .025, -69, 6900),
          (4.85, .04, -65, 4770), (6.435, 0.049, -34, 2870), (6.58, 0.056, -50, 6050),
          (7.357, 0.032, -55, 2560), (7.55, 0.018, -55, 3210)]
# thin plastic creaks faintly on one note under the fingers:
# (time [s], length [s], level [dB], pitch [Hz])
CREAKS = [(0.14, 0.064, -69, 683), (1.885, .03, -57, 564), (2.17, .025, -67, 2050),
          (2.968, .025, -64, 1150), (3.11, .06, -64, 2740), (3.378, 0.0197, -53, 781),
          (3.49, .05, -60, 1194), (3.727, 0.024, -62, 1132), (4.563, 0.009, -52, 1300),
          (5.1, .03, -70, 1280), (5.27, .05, -66.5, 1300), (7.8, 0.021, -64, 1946),
          (7.945, .015, -69.5, 630)]


def scuffs_and_creaks():
    """Resonance bandwidth: a wide band rasps, a narrow one creaks on a note."""
    scuffs = rasps(SCUFFS, half_width_hz=510, flutter_db=2.5)
    return scuffs + rasps(CREAKS, half_width_hz=79, flutter_db=1.5)


# heavier bumps swing the table top or the floor of the box:
# (time [s], frequency [Hz], nominal level [dB], decay to 1/e [s])
THUMPS = [(1.936, 148, -42, 0.02), (2.041, 74, -56, 0.045), (3.211, 186, -40.5, 0.013),
          (3.76, 81, -54, 0.042), (4.527, 73, -28.5, 0.0084), (4.53, 315, -42, 0.018), (5.6, 91, -46, .03),
          (7.69, 79.5, -51, .03), (5.4, 84, -53.5, 0.076), (6.161, 156.6, -35, 0.013),
          (6.49, 145, -32.5, 0.025), (6.495, 301, -25, 0.034), (7.634, 127.4, -39, 0.018)]


def thumps(attack_s=0.0045):
    """Damped oscillation: soft, low swings of the table top and the box."""
    out, t = np.zeros(N), TIME[:SR // 3]
    for s, hz, db, decay in THUMPS:
        swing = np.sin(2 * np.pi * hz * t) * np.exp(-t / decay)
        add(out, s, undb(db) * swing * (1 - np.exp(-t / attack_s)))
    return out


# the table rumbles while the hands work on it: (time [s], level [dB])
RUMBLE = [(1.9, -72), (2.1, -72), (2.8, -73.5), (3.2, -66.5), (3.7, -66.5), (4.1, -75.5), (4.55, -67.5),
          (4.8, -75), (5.4, -68), (6.6, -70), (7.0, -83), (7.7, -66), (8.0, -79)]


def rumble(low_hz=35, high_hz=230, waver_db=2):
    """Structure-borne noise: soft, uneven pushes of the hands carry into the table top."""
    pushes = unit(band(rng.standard_normal(N), low_hz, high_hz, order=2))
    return pushes * undb(waver_db * walk(11)) * gesture(*np.transpose(RUMBLE))


# reverberation of the room: (frequency [Hz], 60 dB decay time [s])
ROOM = [(150, 0.3), (500, 0.27), (1500, 0.31), (4000, 0.21), (8000, 0.28), (14000, 0.3)]


def room(x, gap_s=0.0022, build_s=0.0029):
    """Diffuse reverberation: noise bands that each die at their own rate, unit energy in all."""
    t = TIME[:SR * 2 // 3]
    hz, t60 = np.transpose(ROOM)
    edges = np.geomspace(50, 18000, 10)
    tail = 0
    for lo, hi in zip(edges, edges[1:]):
        decay = np.interp(np.log(lo * hi) / 2, np.log(hz), t60)
        tail = tail + band(rng.standard_normal(len(t)), lo, hi) * undb(-60 * t / decay)
    tail *= np.clip((t - gap_s) / build_s, 0, 1)
    return signal.fftconvolve(x, tail / np.linalg.norm(tail))[:N]


# spectrum of the room air: (frequency [Hz], relative spectral level [dB])
AIR = [(15, -59), (25, -28.5), (42, -8.5), (84, -1.5), (137, -6.5), (195, -10), (301, -5.5), (394, -9.5),
       (659, -5), (840, -13), (1160, -8), (3430, -9.5), (4500, -13.5), (4950, -15), (5500, -18.5),
       (6900, -19), (8100, -23), (9500, -15.5), (16000, -19)]
# steady hum and whine: (nominal frequency [Hz], nominal rms level [dB])
WHINE = [(360.7, -79), (4861, -71), (13430, -91.5)]


def background(air_db=-60.5, waver_db=1.0, jitter=0.00177):
    """Stationary noise and tones: quiet room air with a hum and a thin, slightly wavering whine."""
    air = colour(rng.standard_normal(N), AIR) * undb(air_db)
    turning = 2 * np.pi * np.cumsum(1 + jitter * walk(60)) / SR  # phase per Hz, shared by all tones
    tones = sum(undb(db) * np.sqrt(2) * np.sin(hz * turning) for hz, db in WHINE)
    return air + tones * undb(waver_db * walk(5.32))


def scene():
    """Superposition: direct sounds, their shared reverberation and the air, alike in both channels."""
    near = tray_knocks() + scrape() + groan() + part_into_tray() + settle()
    near += gloves_and_paper() + scuffs_and_creaks() + thumps() + rumble()
    lifted, part = lifted_tray(), part_on_table()
    reflected = room(undb(-9.0) * near + undb(-8.0) * lifted + undb(-8.5) * part)
    mono = near + lifted + part + reflected + background()
    return np.array([mono, mono])


def record(dry, top_hz=15900):
    """Band limitation: the recorder clips at full scale, then an elliptic low-pass cuts the top."""
    low_pass = signal.ellip(10, .2, 70, top_hz, fs=SR, output="sos")
    return signal.sosfilt(low_pass, np.clip(dry, -1, 1))


dry = scene()
out = record(dry)
to_wav(out)
```